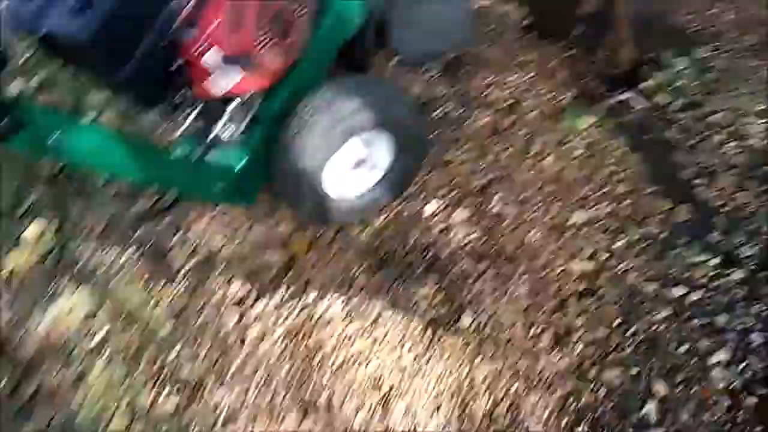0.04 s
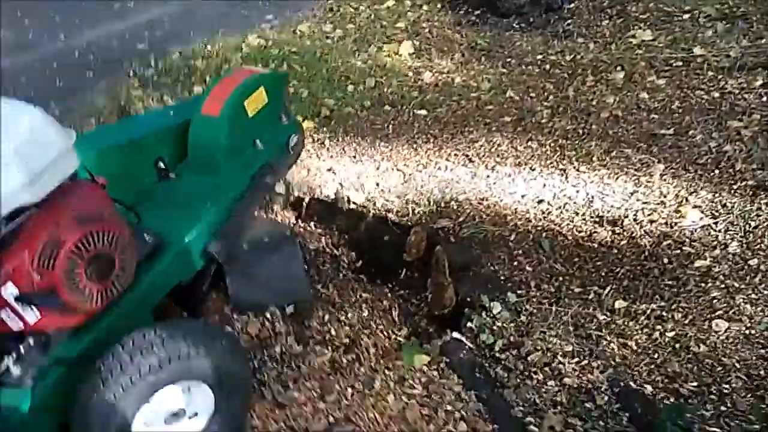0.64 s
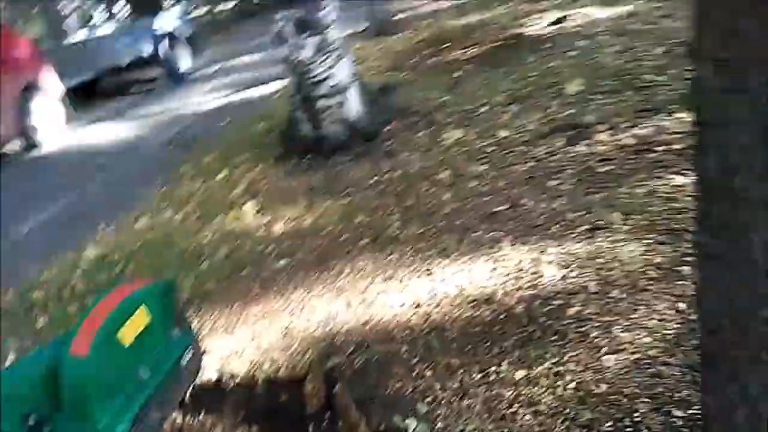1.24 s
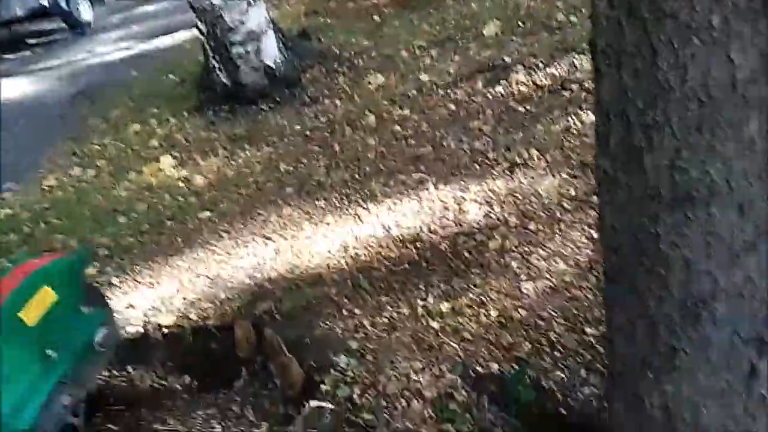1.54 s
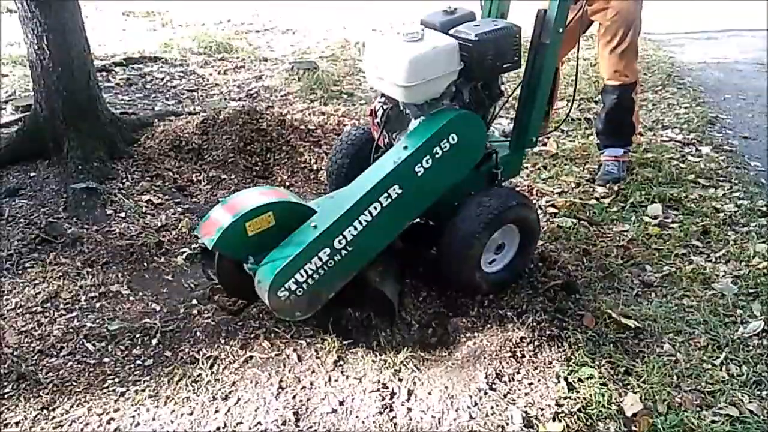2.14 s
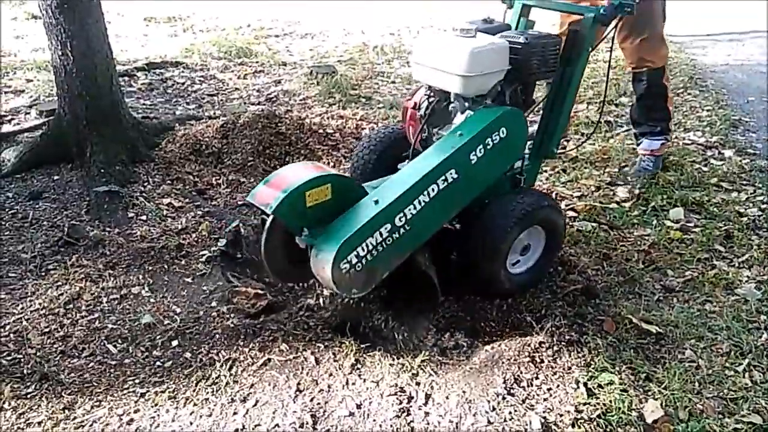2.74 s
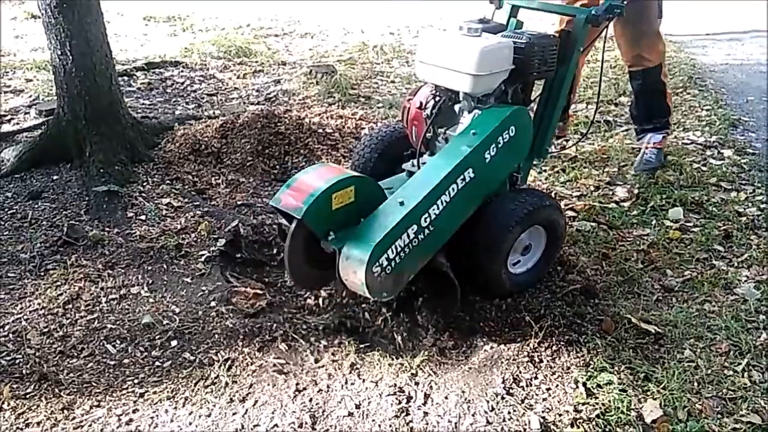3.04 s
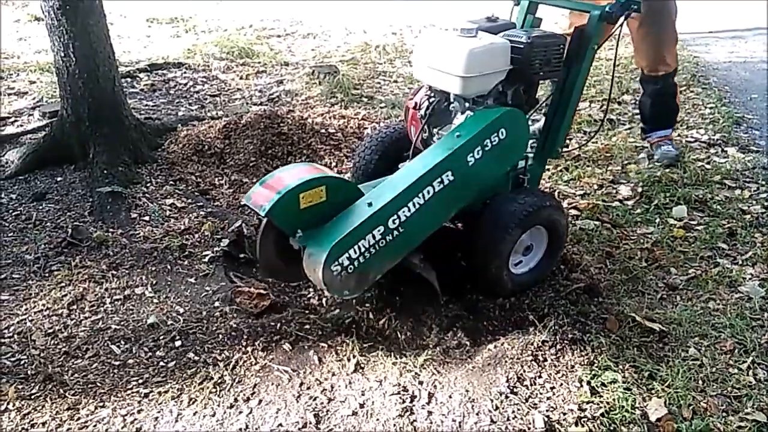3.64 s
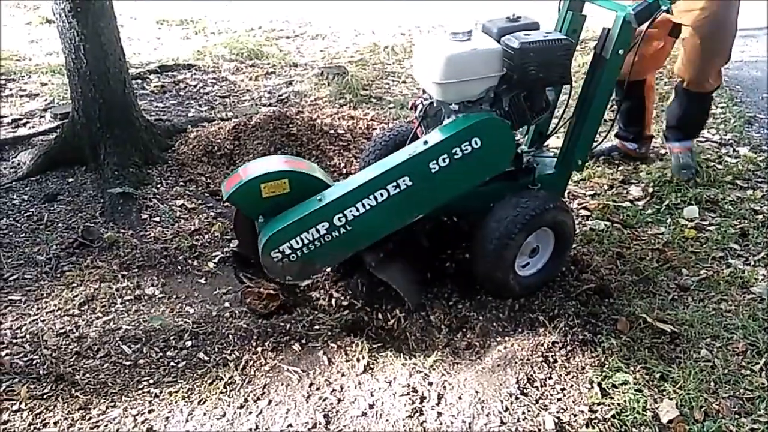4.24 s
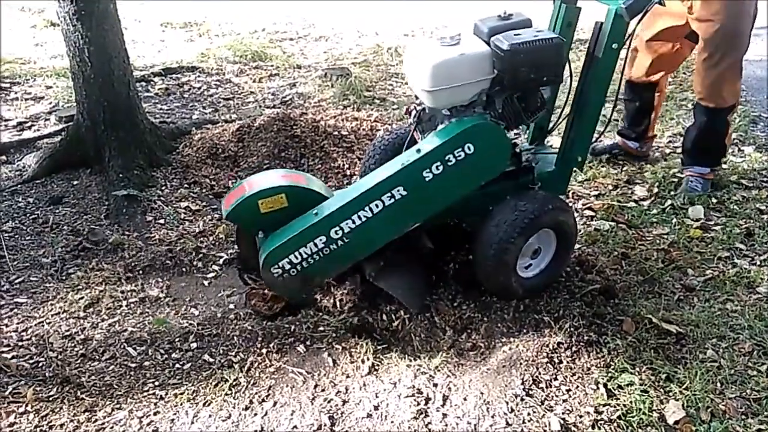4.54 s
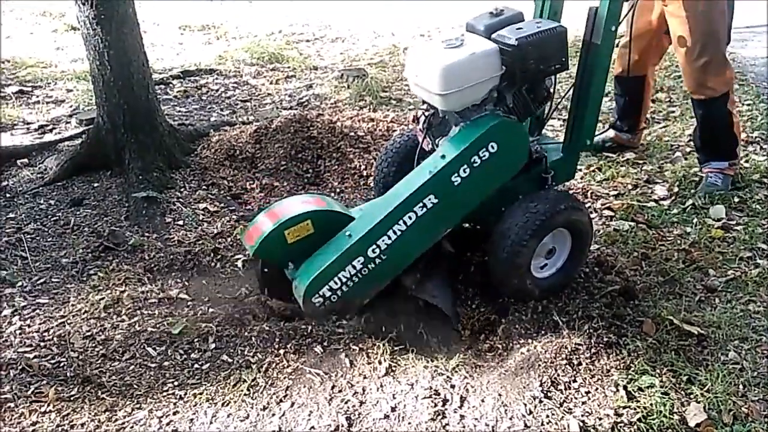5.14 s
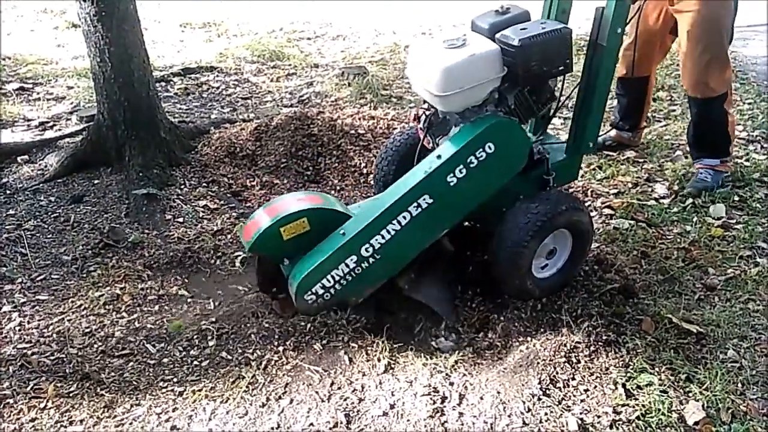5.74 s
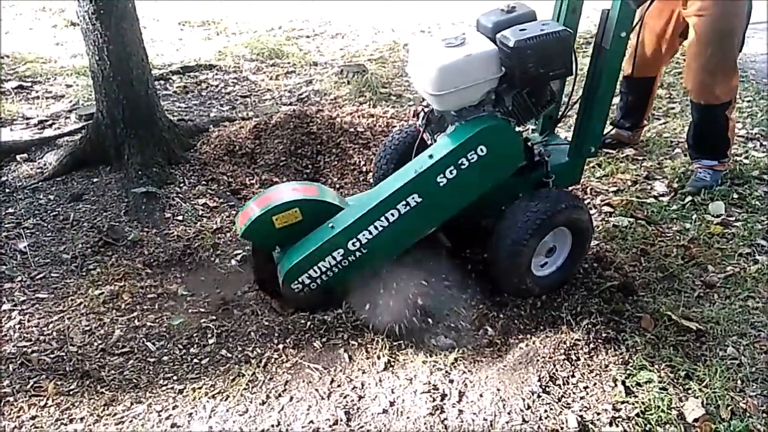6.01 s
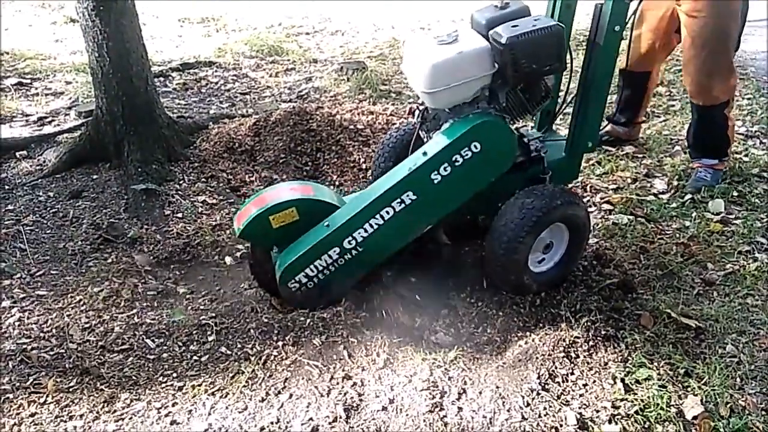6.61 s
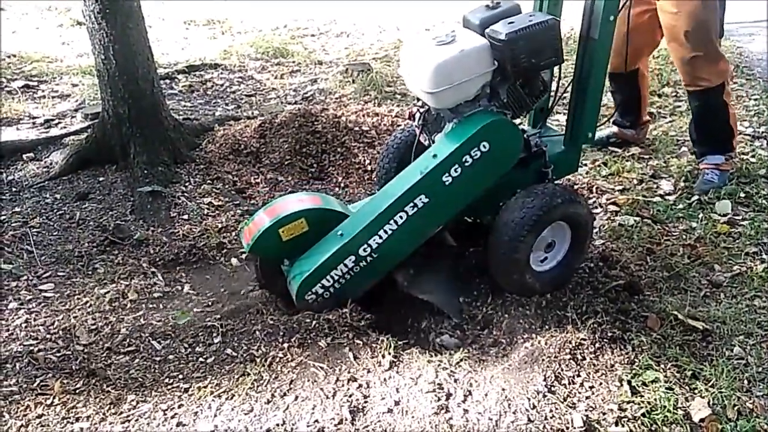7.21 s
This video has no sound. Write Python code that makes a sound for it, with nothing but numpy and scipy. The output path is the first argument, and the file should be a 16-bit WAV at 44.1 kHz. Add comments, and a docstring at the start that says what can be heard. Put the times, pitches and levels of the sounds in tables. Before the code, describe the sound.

A stump grinder's engine drones and scrapes up close, cuts to silence, then fades back in farther away and bites into wood.

```python
"""Stump grinder on a lawn

A petrol grinder runs at arm's length, cuts to silence, then fades in from a few steps away.
Its single cylinder pops, drones and shakes the casing; the cutter wheel throbs against the drone,
scrapes through soil and sprays chips at its steel guard. Near 4.9 s the teeth bite into the stump:
the rasp jumps and the engine sags with every push."""
import sys
import numpy as np
from scipy import signal
from scipy.fft import rfft, irfft
from scipy.io import wavfile
from scipy.ndimage import map_coordinates

SR = 44100
rng = np.random.default_rng(int(sys.argv[2]) if len(sys.argv) > 2 else 0)


def generate_wav(sig):
    """Save sig (samples, or channels by samples) to the path in sys.argv[1] as 16-bit PCM at SR."""
    pcm = np.round(np.clip(np.atleast_2d(sig).T, -1, 1) * 32767).astype(np.int16)
    wavfile.write(sys.argv[1], SR, pcm)


N = 325017
TIME = np.arange(N) / SR
BINS = np.fft.rfftfreq(N, 1 / SR)
FREE_HZ = 27.97  # below this firing rate the engine is under load
LEFT_LAG_S = 0.0003  # the close machine stands a little to the right


def amp(db):
    """Decibels to gain."""
    return 10 ** (np.asarray(db) / 20)


def unit(x):
    """Scales to rms 1."""
    return x / np.sqrt(np.mean(x ** 2) + 1e-20)


def curves(rows):
    """The columns of a timed table, one value a sample."""
    s, *columns = np.transpose(rows)
    return [np.interp(TIME, s, c) for c in columns]


def across(points):
    """A table over frequency, one value a bin."""
    hz, value = np.transpose(points)
    return np.interp(np.log(BINS + 1), np.log(hz), value)


def swell(middle_s, half_s):
    """A bell-shaped rise and fall."""
    return np.exp(-((TIME - middle_s) / half_s) ** 2)


def panned(db):
    """Left and right gains for a left-minus-right level."""
    return amp([[db / 2], [-db / 2]])


def wander(rate_hz):
    """Random drift of rms 1, mostly below the given rate."""
    return unit(irfft(rfft(rng.standard_normal(N)) / (1 + (BINS / rate_hz) ** 2), N))


def grains(per_s, spread_db):
    """Two trains of tiny impacts, most small and a few large."""
    size = amp(spread_db * np.minimum(rng.exponential(1, (2, N)), 4))
    return unit(size * rng.choice([-1, 1], (2, N)) * (rng.random((2, N)) < per_s / SR))


def resonate(x, hz, width_hz):
    """A moving resonance: shifts the curve hz down to zero, smooths twice and shifts back."""
    turn = np.exp(2j * np.pi * np.cumsum(hz) / SR)
    pole = np.exp(-np.pi * width_hz / SR)
    return unit((turn * signal.lfilter([1], np.poly([pole, pole]), x / turn)).real)


def sheet_metal(drive, ripple_db=6.5, spacing_hz=55, drift_s=.25, smooth_above_hz=6500):
    """Countless panel modes ripple the mids and merge in the treble, drifting as the machine moves."""
    hz, s, spectrum = signal.stft(drive, SR, nperseg=2048)
    knots = np.clip(rng.standard_normal((1200, 160)), -2, 2)
    grid = np.meshgrid(hz / spacing_hz, s / drift_s, indexing="ij")
    ripple = map_coordinates(knots, grid, order=1, mode="mirror")
    depth_db = ripple_db * np.clip(hz / 350 - 1, 0, 1) / np.sqrt(1 + (hz / smooth_above_hz) ** 2)
    return signal.istft(spectrum * amp(depth_db[:, None] * ripple), SR)[1][:, :N]


# Stereo width. Each row: frequency in Hz, left-right likeness from 0 to 1.
LIKENESS = [(100, 1), (300, 0.88), (600, 0.88), (1100, 0.84), (1600, 0.53), (2200, 0.41), (4000, 0),
            (9000, 0)]
# Stereo tilt, duller on the right. Each row: frequency in Hz, left minus right in dB.
BALANCE = [(100, 7.5), (320, -2.5), (600, 0), (1000, -1.5), (1700, -4.5), (2800, 0.5), (4500, 3),
           (7000, 0.5), (9000, 1.5), (11000, 9.5), (15000, 5)]
def radiate(drive, colour, lag_s=0):
    """Colours two unrelated drives and spreads them: alike in the bass, wide in the treble."""
    common, apart = rfft(sheet_metal(drive)) * amp(across(colour))
    same, lean = np.clip(across(LIKENESS), -1, 1), amp(across(BALANCE) / 2)
    common, apart = common * np.sqrt(1 + same), apart * np.sqrt(1 - same)
    late = np.exp(-2j * np.pi * BINS * lag_s)
    pair = irfft(np.array([(common + apart) * lean * late, (common - apart) / lean]), N)
    return pair / np.std(pair.mean(0))


# Engine speed: steady, then three pushes into the stump. Each row: time in seconds, firings a second.
ENGINE_SPEED = [(0, 28.56), (.75, 28.61), (1.4, 28.47), (2.5, 28.45), (3, 28.56), (4.1, 28.57),
                (4.85, 28.78), (5.28, 26.96), (5.45, 27.7), (5.82, 28.24), (5.96, 27.5), (6.25, 27),
                (6.53, 28.14), (6.8, 26.89), (6.95, 27.04), (7.22, 28.1), (7.37, 28.13)]
def firing_count(first_s=.007):
    """Engine cycles so far; the cylinder fires on each whole number."""
    cycles = np.cumsum(curves(ENGINE_SPEED)[0]) / SR
    return cycles - np.interp(first_s, TIME, cycles)


def governor(lag_s=0.16):
    """Speed lost to the load, and the throttle that answers it late; both in Hz."""
    sag = np.maximum(FREE_HZ - curves(ENGINE_SPEED)[0], 0)
    return sag, np.interp(TIME - lag_s, TIME, sag)


def tooth_count(cycles, per_firing=5.47, slip=2.9):
    """Teeth passed so far; under load the belt slips and the wheel falls behind."""
    return per_firing * cycles - slip * np.cumsum(governor()[0]) / SR


def exhaust(cycles, orders, scatter, unsteady, jitter=0.0057):
    """Tones crest together in one chug a firing; echoes scatter the crests, high tones flutter most."""
    turns = cycles + jitter * wander(12)
    tones = 0
    for k, db in orders:
        flutter = unit(1 + unsteady * k / 5 * wander(7.3))
        phase = k * turns + scatter * (rng.random() - .5)
        tones -= amp(db) * flutter * np.cos(2 * np.pi * phase)
    core_power = sum(amp(db) ** 2 / 2 for k, db in orders if 3 < k < 7)
    return tones / np.sqrt(core_power)


def crank(cycles, unsteady=.08):
    """The crankshaft turns twice a firing: a deep hum."""
    return unit(np.sin(2 * np.pi * 2 * cycles) * (1 + unsteady * wander(6)))


def pops(cycles, db=-12, half_width_s=0.00046, uneven_db=3.5, jitter=0.0068):
    """The exhaust valve opens: one pressure spike a firing, uneven in strength."""
    turns = cycles + jitter * wander(14)
    firing = np.round(turns).astype(int)
    age = (turns - firing) / FREE_HZ / half_width_s
    strength = amp(db + uneven_db * np.clip(rng.standard_normal(N), -2, 1))[firing]
    return strength * (age ** 2 - 1) * np.exp(-age ** 2 / 2)


def shaking(cycles, locked, throb=0, lumps_db=0, ring_s=0.022):
    """Every firing shakes the same loose metal; gas and fan noise can throb with each crank turn."""
    firings = np.diff(np.floor(cycles), prepend=0) * (1 + 0.088 * rng.standard_normal(N))
    t = TIME[:SR // 16]
    shake = rng.standard_normal((2, len(t))) * np.exp(-t / ring_s)
    rattle = unit(signal.oaconvolve(firings[None], shake, axes=1)[:, :N])
    rush = rng.standard_normal((2, N)) * (1 + throb * np.cos(2 * np.pi * 2 * cycles))
    return locked * rattle + unit(rush * amp(lumps_db * wander(23)))


# The tailpipe's honk. Each row: time in seconds, pitch in Hz, level in dB.
HONK = [(0, 520, -26), (.39, 433, -17), (.52, 483, -26), (.68, 470, -21), (.85, 478, -23),
        (1.08, 467, -24.5), (1.3, 494, -25), (1.6, 465, -31.5), (1.87, 500, -23)]
def tailpipe(cycles, width_hz=115, lumps_db=3, stray=.07):
    """Uneven gas pulses ring the short pipe: a lumpy, hollow honk that strays in pitch."""
    hz, db = curves(HONK)
    level = amp(db + lumps_db * wander(12))
    pulses = shaking(cycles, locked=0.45)[0]
    return level * resonate(pulses, hz * (1 + stray * wander(9.1)), width_hz)


# The wheel's tones. Each row: multiple of the tooth rate, close level in dB, distant level in dB.
WHIRR_TONES = [(1, -33, -28), (2, -44.5, -38.5), (3, -36, -45)]
def whirr(teeth, close, unsteady=0.11):
    """The teeth beat the air just above the exhaust's strongest tone, so the two throb."""
    out = np.zeros(N)
    for k, near_db, far_db in WHIRR_TONES:
        flutter = 1 + unsteady * k ** 2 * (wander(6) + 1j * wander(4.4))
        tone = (np.exp(2j * np.pi * k * teeth) * flutter).real
        out += amp(near_db if close else far_db) * unit(tone)
    return out


# The close exhaust. Each row: multiple of the firing rate, relative level in dB.
NEAR_TONES = [(1, -22.5), (3, -15.5), (4, -4), (5, -2), (6, -11.5), (7, -16.5), (9, -14), (12, -18),
              (13, -13.5), (18, -16.5), (26, -13.5)]
def near_drone(cycles, teeth, rise_db_per_s=1):
    """A slowly swelling exhaust, with crank hum, pops, honk and whirr."""
    drone = amp(-21 + rise_db_per_s * TIME) * exhaust(cycles, NEAR_TONES, scatter=0.14, unsteady=0.2)
    drone += amp(-31.5) * crank(cycles, unsteady=.15) + pops(cycles) + tailpipe(cycles)
    drone += whirr(teeth, close=True)
    left = np.interp(TIME - LEFT_LAG_S, TIME, drone)
    return np.array([left, drone]) * panned(0.5)


# The boom's drift. Each row: time in seconds, pitch in Hz.
BOOM_PITCH = [(0, 263), (.8, 305.5), (1.05, 343), (1.6, 348), (1.9, 303), (2.5, 293.4), (4.3, 302),
              (6.1, 311), (6.5, 322), (6.8, 319.4), (7.37, 298.5)]
def muffler(cycles, width_hz, locked):
    """Gas pulses boom in the muffler's chamber."""
    return resonate(shaking(cycles, locked)[0], curves(BOOM_PITCH)[0], width_hz)


# Fader rides for the close boom and rattle. Each row: time in seconds, level in dB.
NEAR_BOOM_RIDE = [(0, -24), (.2, -22.5), (.35, -39), (.6, -26), (1.1, -22), (1.3, -20.5), (1.45, -19.5),
                  (1.9, -19)]
NEAR_RATTLE_RIDE = [(0, -16), (.4, -18), (.65, -17.5), (1.3, -19), (1.5, -22), (1.9, -19)]
# The close casing's colour. Each row: frequency in Hz, gain in dB.
NEAR_CASING_EQ = [(20, -21), (90, -13), (130, -14.5), (190, -3), (250, 2.5), (340, -9), (470, 0), (600, -2),
                  (750, -6), (830, -18), (1100, -18), (2000, -56)]
def near_body(cycles):
    """The firings boom in the muffler, to the left, and rattle the casing."""
    boom = amp(curves(NEAR_BOOM_RIDE)[0]) * muffler(cycles, width_hz=104, locked=0.69)
    shake = shaking(cycles, locked=0.27, throb=0.091, lumps_db=2)
    rattle = amp(curves(NEAR_RATTLE_RIDE)[0]) * radiate(shake, NEAR_CASING_EQ, LEFT_LAG_S)
    return boom * panned(8) + rattle


def cutter(teeth, per_s, spread_db, bite, uneven_db):
    """Teeth sweep by, each tearing a burst of tiny cracks; every second one cuts deeper."""
    passing = 1 + bite * (np.cos(2 * np.pi * teeth) + 0.48 * np.cos(np.pi * teeth))
    return grains(per_s, spread_db) * passing * amp(uneven_db * wander(23))


# The guard's ring. Each row: pitch in Hz, level in dB, seconds to fall 60 dB.
GUARD_MODES = [(938, -0.5, 0.12), (1021, 1.5, 0.095), (1228, -1.5, 0.13), (1377, -0.5, 0.075),
               (1488, 2.5, 0.075), (1677, 0.5, 0.037), (1810, 4.5, 0.036), (2153, -3, 0.095),
               (2422, -6.5, 0.03), (2787, -2.5, 0.081), (4343, -6.5, 0.062)]
def guard_modes():
    """The steel guard over the wheel rings in decaying sines, one row each."""
    t = TIME[:SR // 10]
    return np.array([amp(db - 60 * t / t60) * np.sin(2 * np.pi * hz * t) for hz, db, t60 in GUARD_MODES])


def pelting(per_s=60, spread_db=4.5, shared=0.5, flex=.03):
    """Chips pelt the guard, each ringing one mode; the pitch wavers as the steel flexes."""
    rings = sum(signal.oaconvolve(grains(per_s, spread_db), mode[None], axes=1)[:, :N]
                for mode in guard_modes())
    bent = TIME + np.cumsum(flex * wander(5)) / SR
    rings = np.array([np.interp(bent, TIME, ring, period=TIME[-1]) for ring in rings])
    return unit(rings + shared * rings[::-1])


# Scuffs in loose soil. Each row: middle in seconds, half length in seconds, boost in dB.
SOIL_SCUFFS = [(0.09, 0.04, 3), (0.24, 0.1, 8.5), (0.91, 0.14, 7), (1.16, .1, 0)]
def scuffs():
    """The boost in dB as the close wheel kicks up soil."""
    return sum(db * swell(s, half_s) for s, half_s, db in SOIL_SCUFFS)


# The close scrape's colour. Each row: frequency in Hz, gain in dB.
NEAR_SCRAPE_EQ = [(400, -15), (800, 2.5), (1000, 5.5), (1300, 2), (1800, 4.5), (2500, 0), (3200, -2.5),
                  (4200, -5), (5300, -9.5), (6500, -27), (9000, -35)]
def near_wheel(teeth, fall_db_per_s=3, scuff_share=0.078):
    """The wheel scrapes soil and pelts the guard, easing off slowly and lifting a little at a scuff."""
    level = amp(-25 - fall_db_per_s * TIME + scuff_share * scuffs())
    cracks = cutter(teeth, per_s=9000, spread_db=2, bite=0.046, uneven_db=2)
    scrape = radiate(cracks, NEAR_SCRAPE_EQ, LEFT_LAG_S)
    return level * panned(-2.5) * (scrape + amp(-5.5) * pelting())


def spray(colour, per_s, spread_db, clumps_db):
    """Grit and chips land in clumps; rms 1 on each side."""
    pair = radiate(grains(per_s, spread_db) * amp(clumps_db * wander(21)), colour)
    return pair / np.std(pair, axis=1, keepdims=True)


# Fader ride for the hiss on the left. Each row: time in seconds, level in dB.
LEFT_HISS_RIDE = [(0, -32), (.055, -31.5), (.09, -14.5), (.2, -17.5), (.34, -17.5), (.4, -19.5), (.48, -17),
                  (.66, -22), (.72, -18.5), (.93, -20.5), (0.99, -27.5), (1.17, -32.5), (1.25, -40),
                  (1.32, -31), (1.9, -30.5)]
# The close spray's colour. Each row: frequency in Hz, gain in dB.
NEAR_SPRAY_EQ = [(2000, -26.5), (3800, -12), (5500, 1), (6800, -1.5), (8000, 3.5), (9200, 3.5), (11000, -5),
                 (13000, -6.5), (15500, -24)]
def near_spray():
    """Flying grit hisses; on the right it spurts with the scuffs."""
    level = amp([curves(LEFT_HISS_RIDE)[0], -34.5 + scuffs()])
    return level * spray(NEAR_SPRAY_EQ, per_s=14000, spread_db=1.8, clumps_db=2)


def air_resonance(path, width_hz, flutter_db):
    """Fluttering noise in a moving air resonance."""
    hz, db = curves(path)
    return amp(db + flutter_db * wander(30)) * resonate(rng.standard_normal(N), hz, width_hz)


# The swish's path. Each row: time in seconds, centre in Hz, level in dB.
SWISH_PATH = [(.04, 2800, -54.5), (.13, 2740, -17), (.19, 3500, -48.5), (.36, 9000, -50.5),
              (.46, 8100, -23), (.52, 7700, -16.5), (.555, 6350, -18.5), (.595, 4940, -13.5),
              (.655, 3930, -16), (.695, 5400, -17.5), (.72, 7300, -20.5), (.82, 7700, -30),
              (1.02, 7450, -63.5)]
def swish():
    """A short rush on the left, then a swish that falls and rises again."""
    return air_resonance(SWISH_PATH, width_hz=3400, flutter_db=1) * amp([[0], [-26]])


# Passes over a root. Each row: middle in seconds, half length in seconds, level in dB, centre in Hz.
ROOT_PASSES = [(0.281, 0.066, -28.5, 1780), (.93, .05, -31, 1890)]
def root_grates(teeth, width_hz=1150):
    """Each pass over a root swells into a hoarse, toothy scrape."""
    rasp = cutter(teeth, per_s=3000, spread_db=0.5, bite=.4, uneven_db=4.5)[0]
    return sum(amp(db) * swell(s, half_s) * resonate(rasp, np.full(N, hz), width_hz)
               for s, half_s, db, hz in ROOT_PASSES)


# The hollow ring's path. Each row: time in seconds, centre in Hz, level in dB.
HOLLOW_PATH = [(1.1, 1820, -57), (1.21, 1780, -34.5), (1.31, 1850, -25.5), (1.37, 2180, -23.5),
               (1.44, 2250, -27.5), (1.49, 2280, -23), (1.54, 2210, -20.5), (1.585, 2100, -30),
               (1.606, 2060, -18.5), (1.635, 2130, -27), (1.9, 2220, -30.5)]
def hollow_ring():
    """A hollow ring glides up and wavers on the left, as if in a cupped hand."""
    return air_resonance(HOLLOW_PATH, width_hz=490, flutter_db=2.9) * amp([[0], [-12]])


# The distant exhaust. Each row: multiple of the firing rate, relative level in dB.
FAR_TONES = [(1, -20), (3, -12.5), (4, -1), (5, 2), (6, -5), (7, -15), (8, -6), (9, -10), (10, -8),
             (11, -12.5), (12, -9)]
# Fader rides for the distant drone and boom. Each row: time in seconds, gain in dB.
FAR_DRONE_RIDE = [(2.5, 0.5), (3, 1), (4.1, 0), (4.8, -2.5), (5.25, -5.5), (5.45, -2), (6.5, 0),
                  (7.15, -0.5), (7.37, -5.5)]
FAR_BOOM_RIDE = [(2.5, -27.5), (3.4, -31.5), (5, -21.5), (5.2, -30.5), (5.7, -26.5), (5.87, -31.5),
                 (6.2, -24), (6.8, -25), (7.37, -25.5)]
def far_drone(cycles, teeth):
    """Exhaust, whirr, hum and boom; the hum grows with the throttle and is choked by the sag."""
    sag, throttle = governor()
    drone = amp(-26.5 - throttle) * exhaust(cycles, FAR_TONES, scatter=0.25, unsteady=0.16)
    drone += whirr(teeth, close=False)
    drone += amp(-37.5 + 8 * throttle - 3.5 * sag) * crank(cycles)
    boom = amp(curves(FAR_BOOM_RIDE)[0]) * muffler(cycles, width_hz=51, locked=0.13)
    return amp(curves(FAR_DRONE_RIDE)[0]) * drone + boom


# Fader ride for the distant rattle. Each row: time in seconds, level in dB.
FAR_RATTLE_RIDE = [(2.5, -24), (3.6, -24), (3.9, -26), (4.85, -26.5), (5.15, -24), (5.45, -27), (6, -24),
                   (6.45, -24.5), (7.1, -23.5)]
# The distant casing's colour. Each row: frequency in Hz, gain in dB.
FAR_CASING_EQ = [(20, -11), (95, -8.5), (135, 1), (165, 2.5), (195, 1), (235, 0), (310, 3.5), (400, 1),
                 (540, 1), (650, -6), (760, -5.5), (1000, -9.5), (2000, -58)]
def far_rattle(cycles):
    """The casing shakes in step with the firings."""
    shake = shaking(cycles, locked=0.54, throb=0.19)
    return amp(curves(FAR_RATTLE_RIDE)[0]) * radiate(shake, FAR_CASING_EQ)


# Wheel pressure: in soil, lifted, then in the stump. Each row: time in seconds, gain in dB.
WHEEL_CONTACT = [(2.5, 0), (2.95, 2), (3.7, 1), (4.25, -6), (4.38, -0.5), (4.55, -4), (4.83, -3),
                 (4.89, -0.5), (5.2, 4.5), (5.7, 0.5), (6.2, 1), (6.47, 0.5), (6.9, 0), (7.37, -1.5)]
# The distant scrape's colour. Each row: frequency in Hz, gain in dB.
FAR_SCRAPE_EQ = [(300, -13), (700, -1), (950, -1), (1120, -0.5), (1400, 1.5), (2000, 0), (2800, -3.5),
                 (3300, -5), (3750, -9.5), (4500, 0), (5300, -9.5), (5900, -22.5), (6700, -9.5),
                 (9000, -23)]
def far_wheel(teeth):
    """Scrape and pelting follow how hard the wheel presses."""
    level = amp(-28.5 + curves(WHEEL_CONTACT)[0])
    cracks = cutter(teeth, per_s=9000, spread_db=1, bite=0.042, uneven_db=1.5)
    return level * (radiate(cracks, FAR_SCRAPE_EQ) + amp(-4) * pelting())


# Fader ride for the spurts. Each row: time in seconds, left level in dB, right level in dB.
SPURT_RIDE = [(2.6, -23, -34.5), (2.8, -18, -28), (2.93, -24, -34.5), (3.5, -25, -36.5), (3.64, -28, -37),
              (3.88, -24, -37), (4.25, -27.5, -42), (4.66, -24, -37), (4.81, -27.5, -40),
              (4.88, -27.5, -29), (5.05, -28, -34), (5.2, -23, -28.5), (5.48, -25, -34), (5.62, -22, -35),
              (5.9, -25, -32), (5.99, -28.5, -36), (6.28, -25.5, -29), (6.47, -22.5, -31), (6.54, -28, -33),
              (6.72, -26.5, -34), (6.95, -23.5, -31.5), (7.37, -25.5, -32)]
# The distant spray's colour. Each row: frequency in Hz, gain in dB.
FAR_SPRAY_EQ = [(2500, -11), (3700, -23), (4600, -12), (5700, 2), (6900, -10.5), (8300, 3.5), (9500, 5),
                (10800, 2.5), (11800, -2), (13000, -8), (15500, -21)]
def far_spray():
    """The wheel throws soil and chips in spurts."""
    return amp(curves(SPURT_RIDE)) * spray(FAR_SPRAY_EQ, per_s=13000, spread_db=3.5, clumps_db=1.87)


# Large chips. Each row: start in seconds, peak level in dB, favoured pitch in Hz.
CHIP_HITS = [(2.895, -28, 1230), (3.977, -27, 1500), (4.569, -21, 1510), (4.755, -24, 1380),
             (5.178, -19, 1370), (5.497, -16, 1510), (6.186, -14, 1820), (6.366, -13.5, 1330),
             (6.606, -14, 1610), (6.761, -20, 1500), (6.954, -13.5, 1410), (7.305, -19, 1380)]
def clanks(focus_hz=90, others_db=-17):
    """A large chip rings the guard; the spot it hits favours one or two modes."""
    out, modes, mode_hz = np.zeros(N), guard_modes(), np.transpose(GUARD_MODES)[0]
    for s, db, hz in CHIP_HITS:
        weights = amp(others_db) + np.exp(-((mode_hz - hz) / focus_hz) ** 2)
        ring = weights @ modes
        part = out[round(s * SR):][:len(ring)]
        part += amp(db) * ring[:len(part)] / abs(ring).max()
    return out


def panel_hum(cycles, order=8, unsteady=0.28):
    """A steel panel sings unevenly on a multiple of the firing rate while the wheel is lifted."""
    tone = np.cos(2 * np.pi * order * cycles + unsteady * wander(8)) * (1 + unsteady * wander(9))
    return amp(-27.5) * swell(middle_s=4.42, half_s=0.68) * unit(tone)


# How deep the teeth tear. Each row: time in seconds, level in dB.
BITE_RIDE = [(4.8, -90), (4.85, -51), (4.875, -29), (5, -30), (5.08, -31), (5.2, -40), (5.36, -28),
             (5.5, -33.5), (5.7, -37.5), (5.78, -26.5), (6, -27.5), (6.2, -27), (6.3, -30), (6.43, -40.5),
             (6.62, -27), (6.8, -30.5), (6.96, -28.5), (7.08, -31.5), (7.28, -34.5), (7.33, -26.5)]
# The colour of splitting wood. Each row: frequency in Hz, gain in dB.
WOOD_EQ = [(600, -25), (1400, 3.5), (2600, 8.5), (3700, 3.5), (5300, 3.5), (6300, -4.5), (9000, -16)]
def tearing(teeth):
    """Splitting fibres add a bright, coarse rasp that surges with each bite."""
    cracks = cutter(teeth, per_s=1400, spread_db=0.5, bite=0.15, uneven_db=1.5)
    return amp(curves(BITE_RIDE)[0]) * radiate(cracks, WOOD_EQ)


# Low thuds. Each row: start in seconds, level in dB, pitch in Hz, decay in seconds.
STUMP_KNOCKS = [(5.628, -23, 76, 0.013), (6.729, -22, 78.4, 0.011)]
def knocks():
    """The wheel knocks against the stump: dull swells of the frame and the ground."""
    out = np.zeros(N)
    for s, db, hz, decay in STUMP_KNOCKS:
        age = np.maximum(TIME - s, 0)
        out += amp(db) * age / decay * np.exp(1 - age / decay) * np.sin(2 * np.pi * hz * age)
    return out


def near_machine(cycles):
    """The grinder at arm's length, running free."""
    teeth = tooth_count(cycles)
    mix = near_drone(cycles, teeth) + near_body(cycles) + near_wheel(teeth)
    return mix + panned(-14) * root_grates(teeth) + near_spray() + swish() + hollow_ring()


def far_machine(cycles):
    """The grinder from a few steps, working through soil into the stump."""
    teeth = tooth_count(cycles)
    mix = far_drone(cycles, teeth) + panel_hum(cycles) + far_rattle(cycles)
    return mix + far_wheel(teeth) + tearing(teeth) + far_spray()


def scene(stop_s=1.894, resume_s=2.512, far_lag_cycles=.39):
    """The close sound stops dead; after the silence the distant one fades in right to the end."""
    cycles = firing_count()
    cut = np.exp(-np.maximum(TIME - stop_s, 0) / 0.0044)
    fade_in = np.clip((TIME - resume_s) / (TIME[-1] - resume_s), 0, 1) ** 0.7
    machine = cut * near_machine(cycles) + fade_in * far_machine(cycles - far_lag_cycles)
    return machine + clanks() + knocks()


def record(dry, ceiling=.95, edge_hz=15700):
    """Rounds off the loudest peaks, then trims the top octave's upper edge."""
    rounded = dry / (1 + (dry / ceiling) ** 8) ** (1 / 8)
    lowpass = signal.firwin(511, edge_hz, window=("kaiser", 9), fs=SR)
    return signal.oaconvolve(rounded, lowpass[None], "same")


dry = scene()
out = record(dry)
generate_wav(out)
```